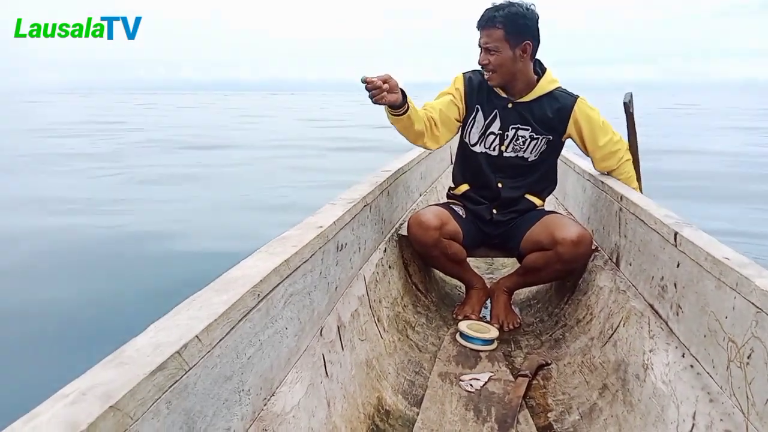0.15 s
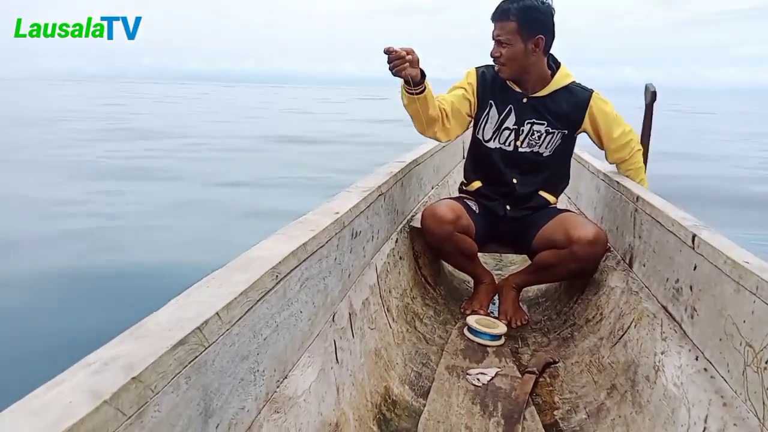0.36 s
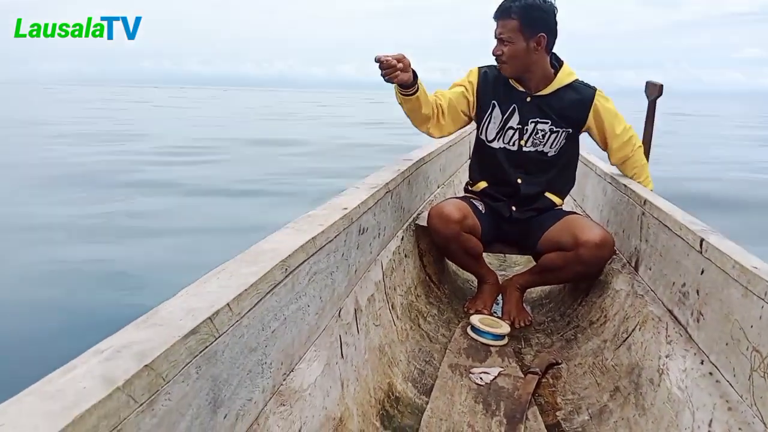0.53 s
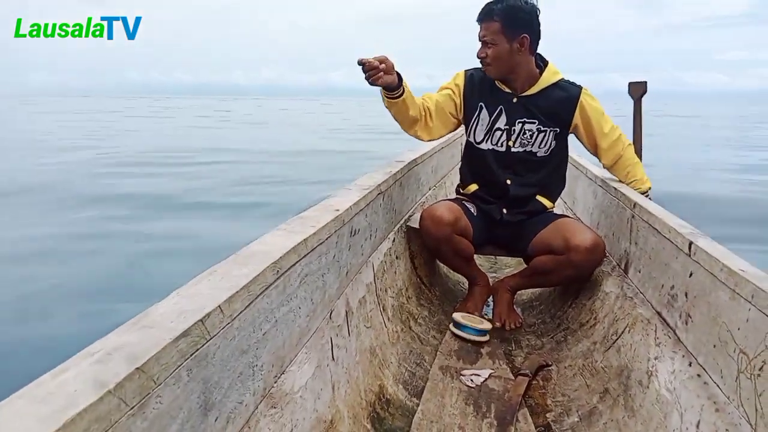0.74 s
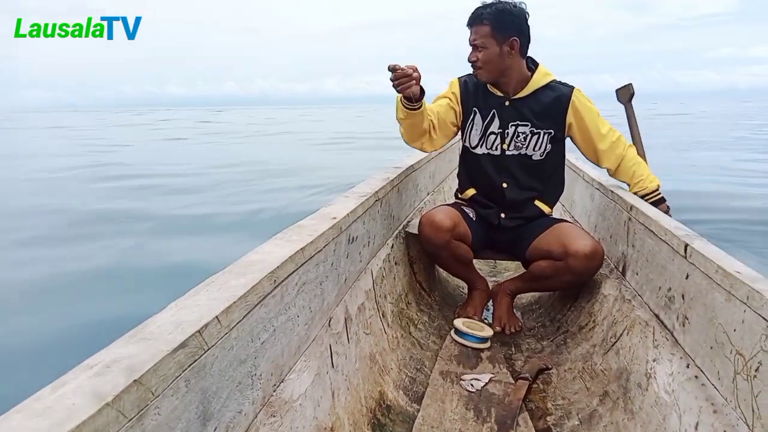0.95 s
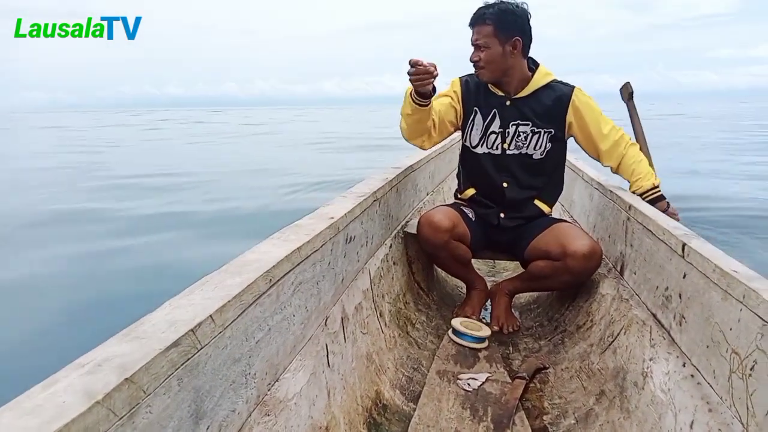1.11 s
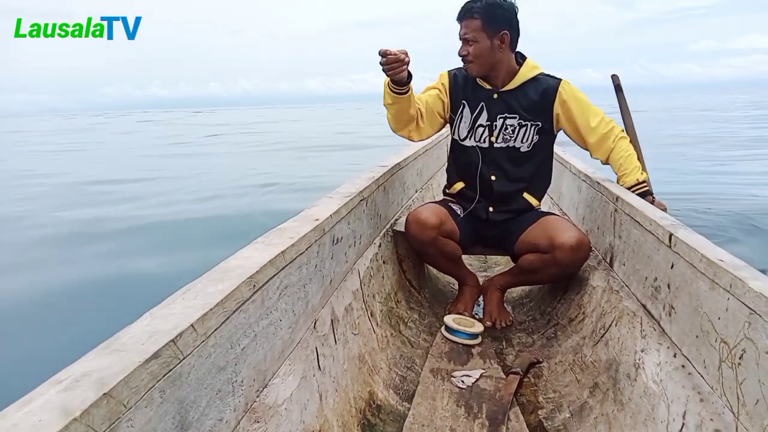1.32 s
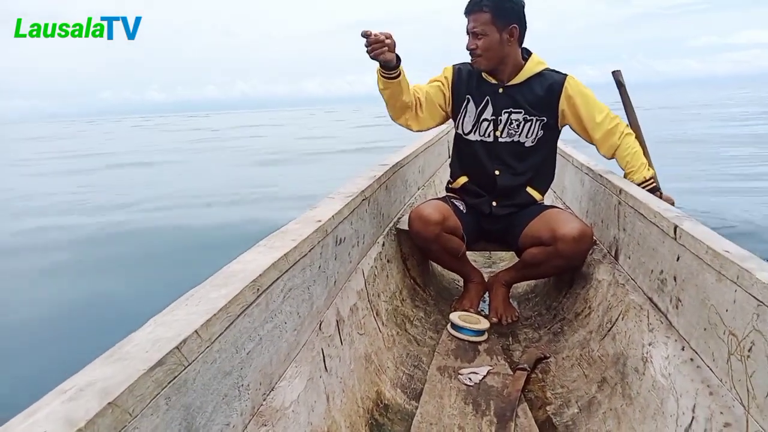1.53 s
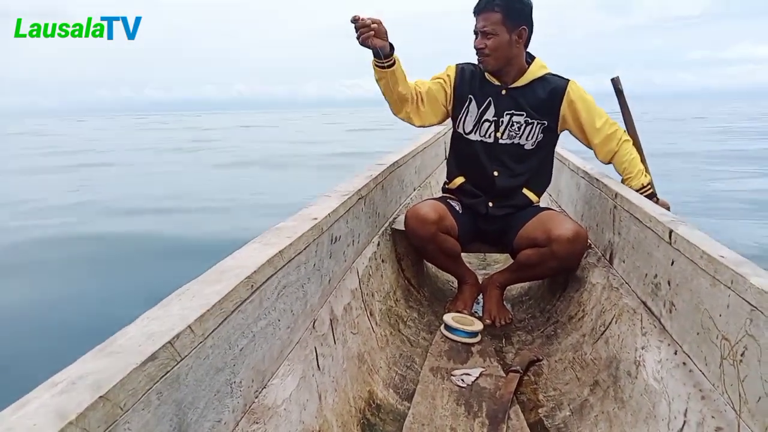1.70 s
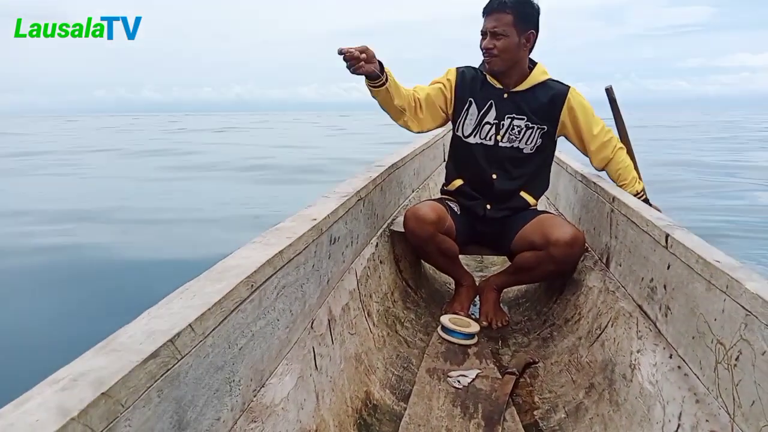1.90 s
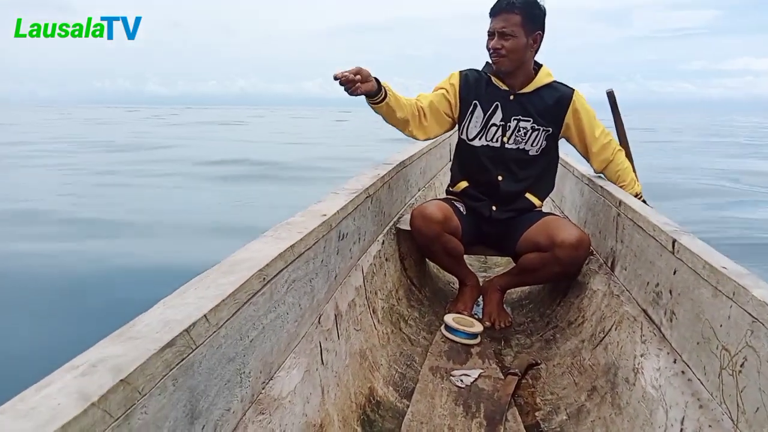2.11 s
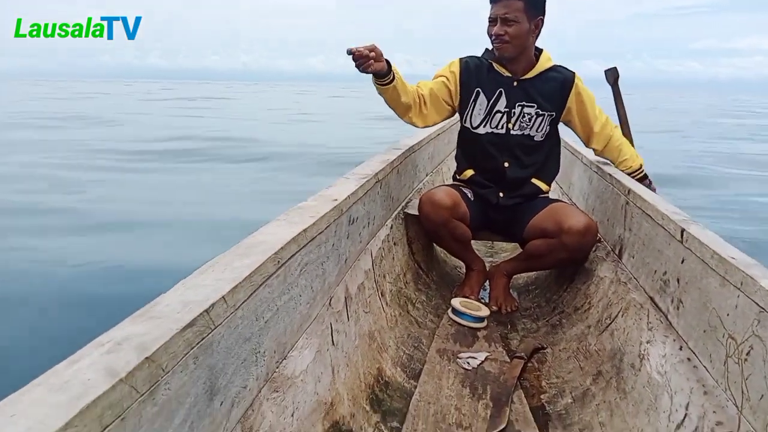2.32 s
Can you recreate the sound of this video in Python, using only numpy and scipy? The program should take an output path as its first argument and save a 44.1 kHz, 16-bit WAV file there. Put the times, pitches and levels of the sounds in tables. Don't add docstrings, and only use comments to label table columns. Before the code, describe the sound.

A paddle bumps and rattles on a small wooden hull early on, faint squeak and rustle follow, water trickles softly, then a second duller knock with small bounces; close, dry, outdoors on calm water.

```python
import sys
import numpy as np
from scipy import signal
from scipy.io import wavfile

SR = 44100
rng = np.random.default_rng(int(sys.argv[2]) if len(sys.argv) > 2 else 0)


def wav_record(signal):
    frames = np.transpose(np.atleast_2d(signal))
    bounded = np.clip(frames, -1, 1)
    quanta = np.round(bounded * 32767).astype(np.int16)
    wavfile.write(sys.argv[1], SR, quanta)


def level_to_linear(level):
    exponent = np.asarray(level, float) / 20
    return 10 ** exponent


N = 103635


def rms_one(x):
    return x / np.sqrt(np.mean(x ** 2) + 1e-20)


def drift(rate_hz):
    hop, settle = 40, 2000
    r = np.exp(-2 * np.pi * rate_hz * hop / SR)
    chance = rng.standard_normal(N // hop + settle + 2)
    slow = rms_one(signal.lfilter([1], [1, -2 * r, r * r], chance)[settle:])
    return np.interp(np.arange(N) / hop, np.arange(len(slow)), slow)


def add(out, start_s, piece):
    i = int(start_s * SR)
    out[i:i + len(piece)] += piece[:N - i]


def banded_noise(spectrum, patchy_db):
    out = 0
    edges = 24 * 2 ** np.arange(0, 9.6, 1 / 4)
    white = rng.standard_normal((2, N + SR // 4))
    table_hz, table_db = np.transpose(spectrum)
    together = drift(12)
    for k, (low, high) in enumerate(zip(edges, edges[1:])):
        centre = np.log(low * high) / 2
        level_db = np.interp(centre, np.log(table_hz), table_db, left=-70, right=-70)
        band_pass = signal.butter(2, [low, high], "band", fs=SR, output="sos")
        band = signal.sosfilt(band_pass, white[k % 2])[-N:]
        out = out + band * level_to_linear(level_db + patchy_db * (together + drift(14)))
    return rms_one(out)


def resonance(x, hz, width_hz):
    r = np.exp(-np.pi * width_hz / SR)
    for _ in range(2):
        x = signal.lfilter([1, 0, -1], [1, -2 * r * np.cos(2 * np.pi * hz / SR), r * r], x)
    return x / np.abs(x).max()


# t/s, level/dB
WASH_LEVEL = [
    (0, -64),
    (0.299, -68),
    (0.701, -65),
    (.85, -70.5),
    (1.6, -72.5),
    (1.7, -66),
    (2.0, -65.5),
    (2.35, -61.5),
]
# f/Hz, level/dB per Hz
SEA_SPECTRUM = [(25, -20), (60, -7), (110, 3.5), (300, 4.5), (800, -0.5), (3300, -4), (5200, -23.5),
                (15500, -36.5)]
# f/Hz, level/dB per Hz
LAPPING_SPECTRUM = [(40, -17.5), (70, 0), (100, -3), (160, -10), (260, -15.5)]


def water():
    sea_db, lapping_db = 3.5, -69.5
    wash_db = np.interp(np.arange(N) / SR, *np.transpose(WASH_LEVEL))
    lapping = banded_noise(LAPPING_SPECTRUM, patchy_db=2.5)
    lapping *= level_to_linear(lapping_db + 0.34 * (wash_db - wash_db.mean()))
    return level_to_linear(wash_db + sea_db) * banded_noise(SEA_SPECTRUM, patchy_db=2.38) + lapping


# t/s, peak
# level/dB, f/Hz, length/ms
DROP_EVENTS = [(.010, -53, 3250, 3), (.0262, -42, 3250, 1.6), (.177, -52, 3440, 10),
               (.3273, -20, 1440, 2.6), (.3318, -31, 1440, 5), (1.3335, -53, 1500, 2.5),
               (1.345, -56, 3700, 2.5), (1.7743, -40, 3500, .7), (1.7748, -50, 2200, 1.5),
               (.101, -48, 108, 14), (.404, -52, 1220, 9), (1.130, -57, 130, 10), (.022, -56, 1980, 14),
               (.036, -57, 810, 14), (.146, -60, 820, 12), (.30, -52, 75, 40), (.42, -56, 95, 40),
               (.592, -56, 620, 10), (.644, -51, 585, 16), (.647, -57, 480, 14), (.666, -58, 1720, 12),
               (.703, -60, 790, 10), (1.855, -56, 120, 25), (2.058, -39, 163, 50), (2.197, -49, 145, 22),
               (2.31, -54, 80, 19), (.004, -56, 320, 12), (.024, -56, 850, 6), (.03, -60, 1250, 8),
               (1.3325, -63, 8600, 4), (1.345, -63, 4800, 2.5), (1.243, -63, 1500, 8), (.505, -65, 1980, 8),
               (.528, -66, 3080, 8), (.64, -67, 4050, 12), (2.315, -58, 800, 10), (2.336, -50, 250, 5),
               (2.055, -51, 78, 30), (2.165, -51, 105, 22), (2.107, -48, 2000, 1.2), (.214, -49, 68, 18),
               (.222, -38, 158, 16), (.304, -30, 650, 7), (2.225, -54, 110, 22)]


def drops():
    pitch_rise, attack = 0.03, 0.25
    out, uneven = np.zeros(N), level_to_linear(3 * drift(120))
    for start_s, db, hz, ms in DROP_EVENTS:
        u = np.arange(int(2 * ms * SR / 1000)) * 1000 / SR / ms
        shape = np.minimum(u / attack, 1) * np.exp(-2.5 * np.maximum(u - attack, 0) ** 2)
        if 8 < ms < 20:
            shape *= uneven[int(start_s * SR):][:len(u)]
        phase = 2 * np.pi * np.cumsum(hz * (1 + pitch_rise * u)) / SR
        add(out, start_s, level_to_linear(db) * shape * np.sin(phase))
    return out


# t/s, level/dB, length/ms, tilt/dB per octave
SNAP_EVENTS = [(.0262, -46.5, 2, -21.5), (0.3155, -30.5, 1.8, 2.5), (0.3201, -33, 7.3, 6),
               (0.3214, -24, 1.2, -2), (.3242, -37, 5.4, 0.5), (0.3274, -25.5, 3.4, -3),
               (0.3311, -34.5, 2.5, -0.5), (.473, -58.5, 2.5, 3), (.625, -53.5, 3.2, -16),
               (0.771, -60.5, 1.68, -8.5), (1.333, -49.5, 1.3, -7)]
# f/Hz, width/Hz, level/dB
CRACK_RESONANCES = [(2030, 510, -13), (3280, 370, -7), (4470, 440, -11), (6100, 1500, -11),
                    (7940, 1300, -5.5), (11100, 1500, -21), (14000, 2500, -22)]


def snaps():
    out, t = np.zeros(N), np.arange(SR // 25) / SR
    for start_s, db, ms, tilt_db in SNAP_EVENTS:
        burst = rng.standard_normal(len(t)) * np.exp(-2000 * t / ms)
        burst[0] = 2.8
        for hz, width_hz, level_db in CRACK_RESONANCES:
            tilted_db = db + level_db + tilt_db * np.log2(hz / 3300)
            add(out, start_s, resonance(burst, hz, width_hz) * level_to_linear(tilted_db))
    return out


# t/s, length/s, level/dB
RUSTLE_EVENTS = [(.035, 0.042, -70), (.212, .02, -83), (0.452, .04, -72), (.63, 0.03, -73),
                 (0.702, 0.022, -70), (.998, .03, -70), (1.06, 0.04, -80), (1.13, .016, -76),
                 (1.312, 0.037, -78), (1.72, 0.03, -76), (1.928, 0.02, -80), (2.195, 0.037, -73),
                 (.925, .02, -82), (1.18, .012, -81), (1.235, .012, -81), (0.469, 0.34, -76),
                 (0.72, 1.0, -83), (1.756, 0.11, -75), (1.56, 0.86, -80), (2.144, 0.42, -74)]
# f/Hz, level/dB per Hz
RUSTLE_SPECTRUM = [(2500, -41.5), (4200, 1), (5600, 1), (6700, -13.5), (8200, 3.5), (9500, -7.5),
                   (13500, -5.5), (16000, -6.5)]


def rustles():
    swell = np.zeros(N)
    for start_s, length_s, db in RUSTLE_EVENTS:
        add(swell, start_s, level_to_linear(db) * np.hanning(int(length_s * SR)) ** 0.48)
    grain = level_to_linear(3 * drift(150))
    return swell * grain * banded_noise(RUSTLE_SPECTRUM, patchy_db=1.5)


# t/s, length/s, from f/Hz, to f/Hz, level/dB
SQUEAK_EVENTS = [
    (0.39, 0.087, 1590, 1740, -61),
    (0.504, .132, 1937, 1200, -59),
    (.695, 0.09, 1330, 1330, -69),
    (.135, 0.04, 6560, 7250, -78),
    (.49, .03, 6900, 7300, -81),
    (0.89, 0.04, 6800, 6900, -86),
    (1.155, 0.088, 7100, 7750, -84.5),
    (1.251, 0.052, 6900, 7500, -80),
]


def squeaks():
    out = np.zeros(N)
    flutter, wobble = level_to_linear(3.2 * drift(50)), 1 + 0.011 * drift(30)
    for start_s, length_s, from_hz, to_hz, db in SQUEAK_EVENTS:
        u = np.linspace(0, 1, int(length_s * SR))
        glide = 0.35 * u + 0.65 * u ** 4 if to_hz < from_hz else u
        hz = (from_hz + (to_hz - from_hz) * glide) * wobble[int(start_s * SR):][:len(u)]
        shape = np.sin(np.pi * u ** 1.2) ** 0.5
        add(out, start_s, level_to_linear(db) * shape * np.sin(2 * np.pi * np.cumsum(hz) / SR))
    return out * flutter


# t/s, plank level/dB, contact/ms, shaft ring level/dB
KNOCK_EVENTS = [(0.211, -23, 0.31, -37.5), (.2160, -16, 0.49, -6.5), (.2173, -32.5, 0.42, -16),
                (0.2207, -30, 0.9, -20), (0.2302, -19, 1.59, -16.5), (.2900, -27, 0.94, -24),
                (0.2935, -41, 0.89, -17), (0.3046, -24.5, 1.19, -12), (0.341, -26.5, 1.28, -42.5),
                (0.352, -32.5, 1.8, -35), (.394, -33.5, 1.8, -50), (0.409, -48.5, 0.38, -44.5),
                (0.503, -43.5, 2.27, -66.5), (0.52, -56, 1.3, -62.5), (1.668, -49.5, 1.87, -52.5),
                (1.951, -42, 1.8, -26), (2.0491, -18.5, 0.15, -16.5), (2.0566, -64, 1.25, -21.5),
                (2.1070, -29.5, 0.15, -32.5), (2.117, -37, 3.1, -27), (2.129, -30.5, 3.5, -48),
                (2.153, -46, 2.35, -47), (2.175, -33.5, 3.9, -61), (2.204, -49.5, 2.5, -59.5),
                (2.284, -42.5, 3.5, -65), (2.335, -54, 1.5, -70)]


def struck(modes, column, start_s=0, end_s=9):
    mode_spread_db = 1.5
    out, spread = np.zeros(N), rng.standard_normal((len(KNOCK_EVENTS), len(modes)))
    for k, (hz, db, t60_s) in enumerate(modes):
        force = np.full(N, 1e-18)
        for knock, chance in zip(KNOCK_EVENTS, spread):
            if not start_s <= knock[0] < end_s:
                continue
            push = np.hanning(int(knock[2] * SR / 1000) + 3)
            push_db = knock[column] + db + mode_spread_db * chance[k]
            add(force, knock[0], push / (len(push) / 2) * level_to_linear(push_db))
        r, w = level_to_linear(-60 / (t60_s * SR)), 2 * np.pi * hz / SR
        ring = signal.lfilter([0, np.sin(w)], [1, -2 * r * np.cos(w), r * r], force)
        out += ring * (-1) ** k
    return out


# f/Hz, level/dB, t60/s
STERN_PLANKS = [(165, -11, 0.14), (189.4, -5.5, 0.1), (284, -15, .07), (317.4, -3, 0.3), (377, -8, 0.059),
                (449.6, -0.5, 0.15), (500, -9.5, 0.032), (544, -13.5, 0.067), (601, -10.5, 0.039),
                (639, -9, 0.073), (699, -4.5, 0.0692), (777, -8.5, .05), (898, -12.5, 0.04),
                (985, -15, 0.093)]
# f/Hz, level/dB, t60/s
HULL_PLANKS = [(104.2, -24.5, 0.32), (167.7, -6, 0.15), (185, -3.5, 0.054), (270, -4, 0.073),
               (289, -4.5, 0.086), (345.3, -1.5, 0.11), (439, -6.5, 0.12), (452, -1.5, 0.046),
               (535, -5, 0.088), (645, -2.5, 0.034), (654, -13, 0.066), (868, 1.5, 0.029),
               (998, -14.5, 0.036), (1047, -3.5, 0.027)]
# f/Hz, level/dB, t60/s
SHAFT_MODES = [(742, 3.5, 0.028), (1004, -7.5, 0.023), (1185, -8, 0.026), (1376, -9.5, 0.032),
               (1628, -13.5, 0.026), (1972, -27.5, .025), (2436, -32.5, 0.034), (3180, -44.5, .02)]
# f/Hz, level/dB, t60/s
LOW_GRIP_MODES = [(621, 2.5, 0.028), (887, -2.5, 0.02), (1064, -3.5, 0.037), (1213, -11.5, 0.03),
                  (1410, -19.5, 0.031), (1640, -21.5, 0.047), (1943, -23.5, 0.051), (2375, -27, 0.038),
                  (3330, -40.5, 0.022)]


def wood():
    leave_stern_s, regrip_s = 0.25, 1.2
    scatter_db, scatter_t60_s, scatter_rise_s = -10.5, 0.17, 0.006
    rung = struck(STERN_PLANKS, column=1, end_s=leave_stern_s)
    rung += struck(HULL_PLANKS, column=1, start_s=leave_stern_s)
    rung += struck(SHAFT_MODES, column=3, end_s=regrip_s)
    rung += struck(LOW_GRIP_MODES, column=3, start_s=regrip_s)

    t, power = np.arange(SR // 3) / SR, np.zeros(N)
    for start_s, plank_db, _, _ in KNOCK_EVENTS:
        tail = level_to_linear(plank_db + scatter_db - 60 * t / scatter_t60_s) * np.minimum(t / scatter_rise_s, 1)
        add(power, start_s, tail ** 2)
    dull_band = signal.butter(2, [190, 520], "band", fs=SR, output="sos")
    rung += np.sqrt(power) * rms_one(signal.sosfilt(dull_band, rng.standard_normal(N)))
    return signal.sosfilt(signal.butter(2, 120.1, "high", fs=SR, output="sos"), rung)


def spray():
    spray_db, spray_ms = -33, 3
    out, t = np.zeros(N), np.arange(SR // 25) / SR
    for start_s, _, _, shaft_db in KNOCK_EVENTS:
        burst = rng.standard_normal(len(t)) * np.exp(-1000 * t / spray_ms)
        add(out, start_s, level_to_linear(spray_db + shaft_db) * resonance(burst, hz=2200, width_hz=1500))
    return out


def trickle():
    start_s, length_s, level_db = 1.22, 0.36, -71
    out, size = np.zeros(N), int(length_s * SR)
    uneven = rng.standard_normal(N) * level_to_linear(4 * drift(25))
    flow = resonance(uneven, hz=1530, width_hz=320)[:size]
    add(out, start_s, level_to_linear(level_db) * rms_one(flow) * np.hanning(size) ** 0.5)
    return out


def scene():
    return (wood() + spray() + snaps() + drops() + squeaks() + trickle() + rustles() + water())[None]


def roll_off(x):
    return signal.sosfilt(signal.butter(12, 15790, fs=SR, output="sos"), x)


def record(dry):
    mix = signal.sosfilt(signal.butter(2, 45, "high", fs=SR, output="sos"), dry)
    return roll_off(mix)


dry = scene()
out = record(dry)
wav_record(out)
```